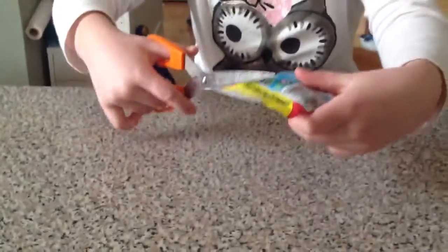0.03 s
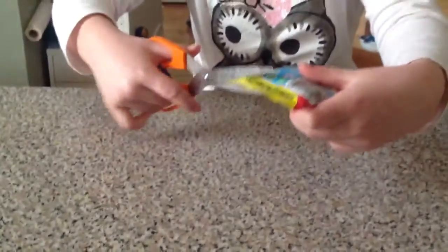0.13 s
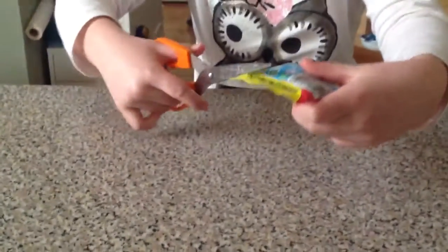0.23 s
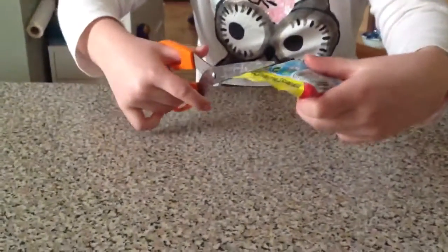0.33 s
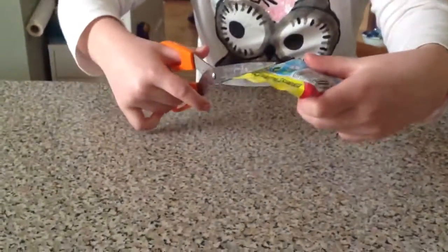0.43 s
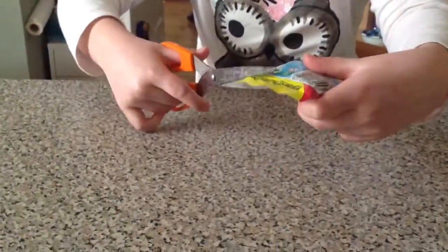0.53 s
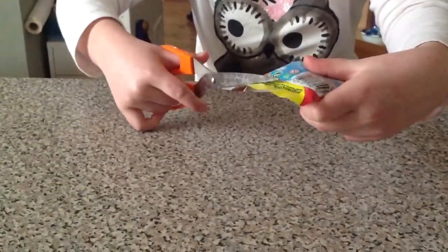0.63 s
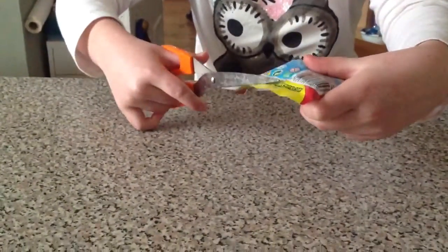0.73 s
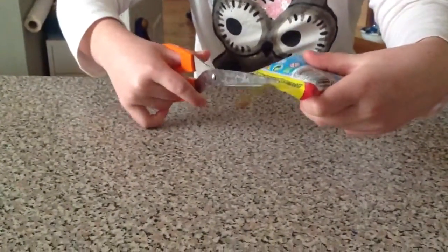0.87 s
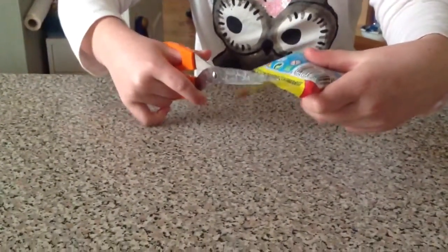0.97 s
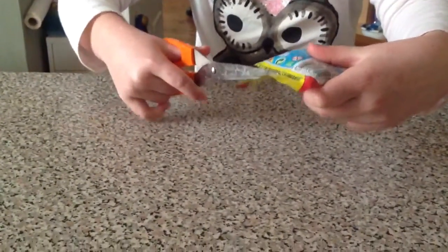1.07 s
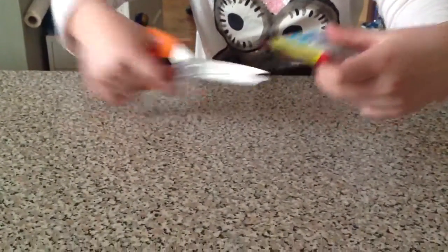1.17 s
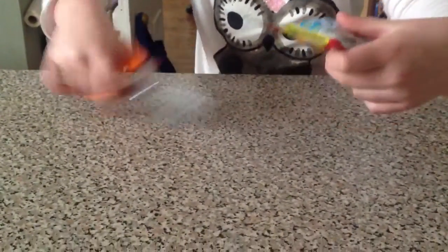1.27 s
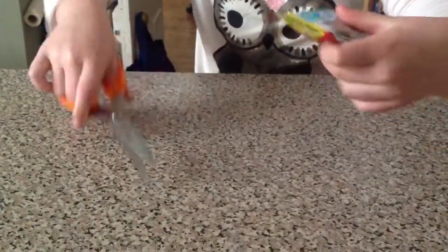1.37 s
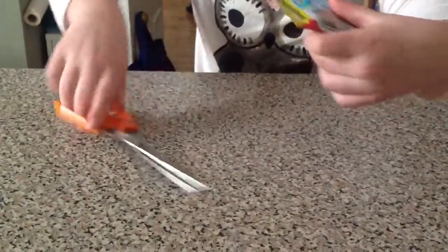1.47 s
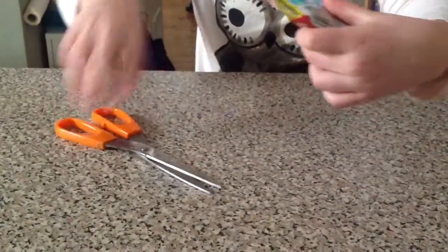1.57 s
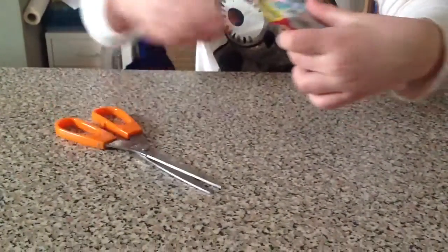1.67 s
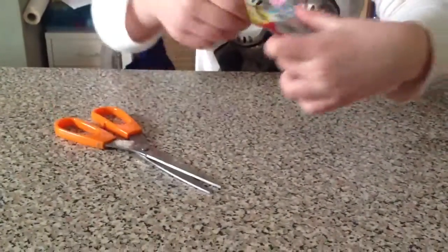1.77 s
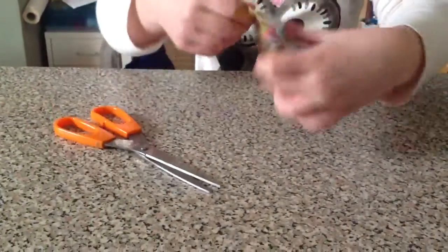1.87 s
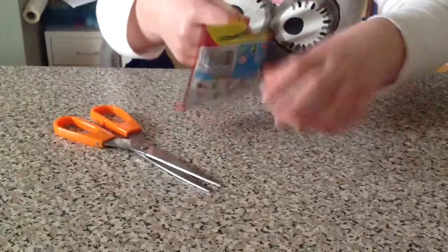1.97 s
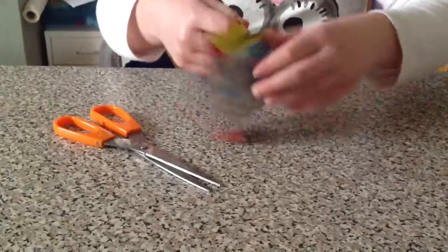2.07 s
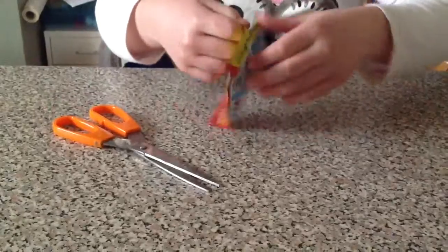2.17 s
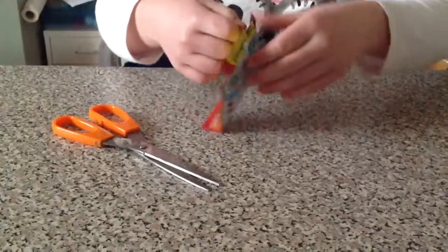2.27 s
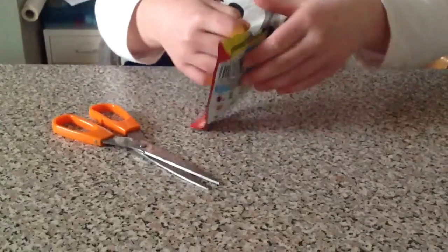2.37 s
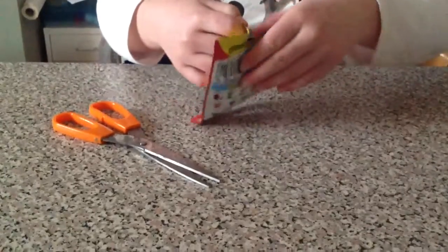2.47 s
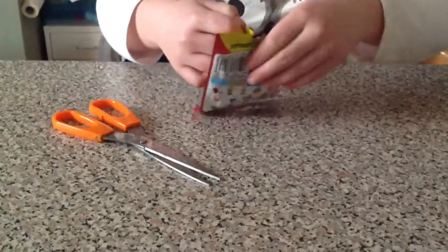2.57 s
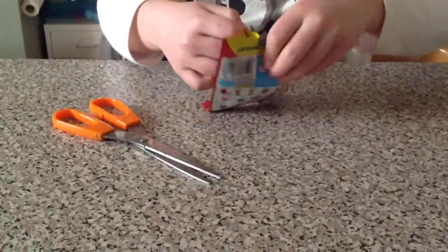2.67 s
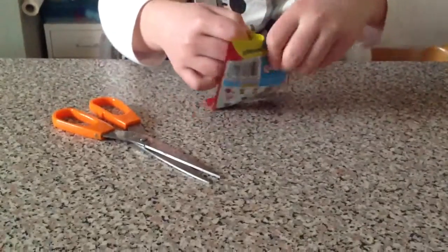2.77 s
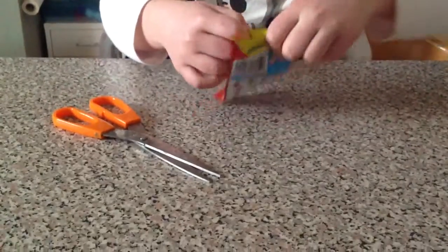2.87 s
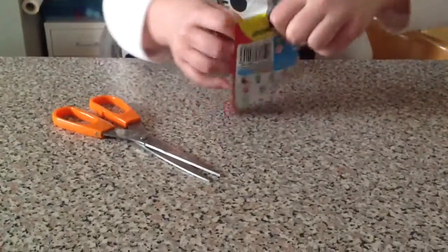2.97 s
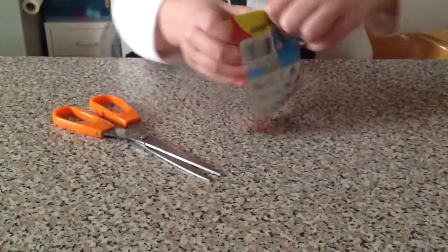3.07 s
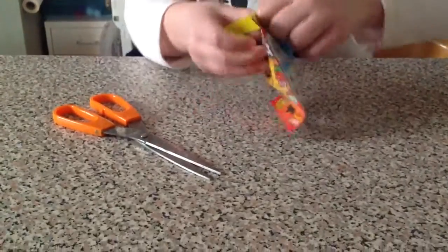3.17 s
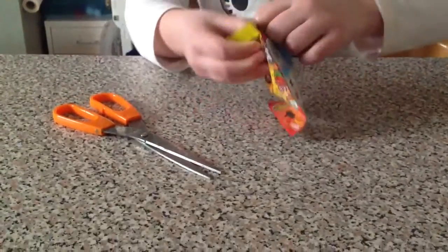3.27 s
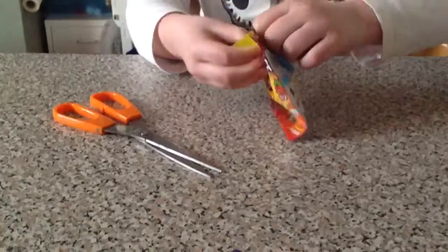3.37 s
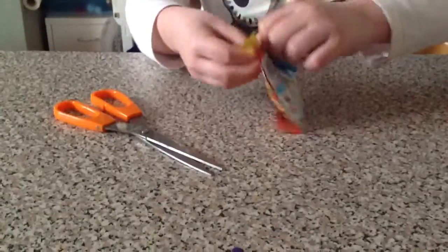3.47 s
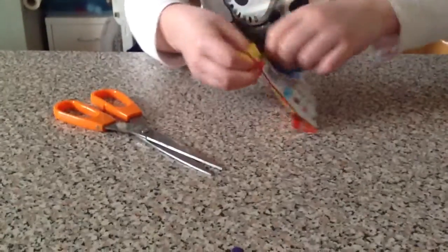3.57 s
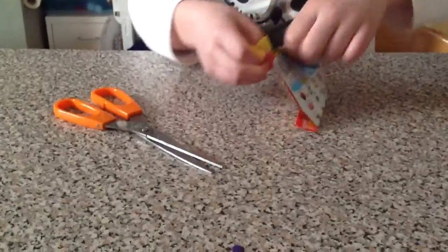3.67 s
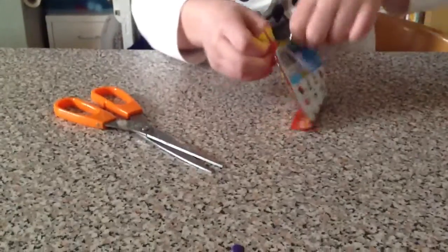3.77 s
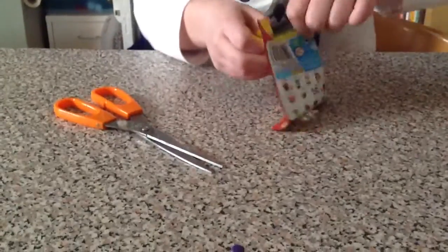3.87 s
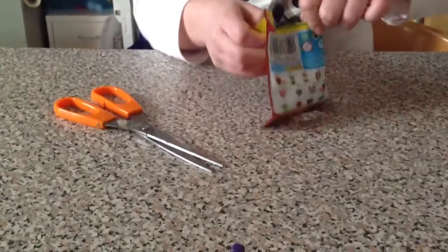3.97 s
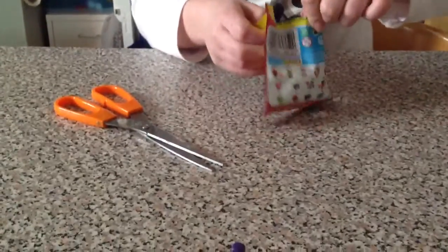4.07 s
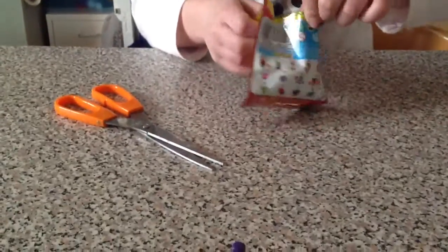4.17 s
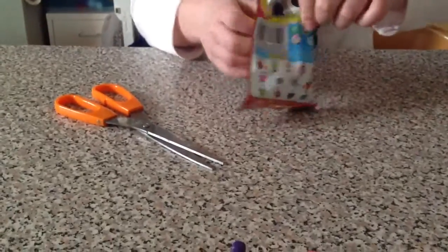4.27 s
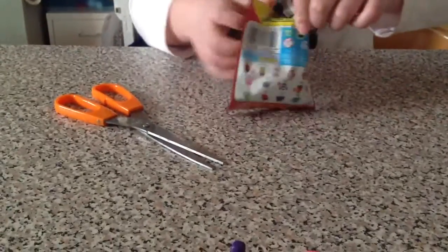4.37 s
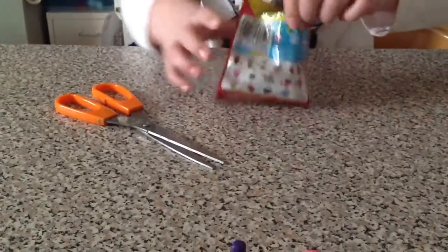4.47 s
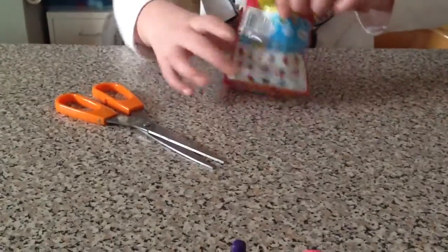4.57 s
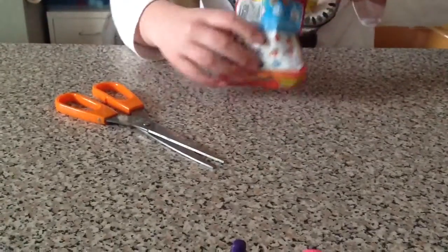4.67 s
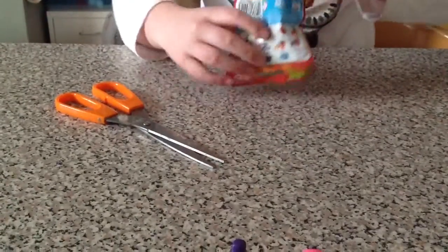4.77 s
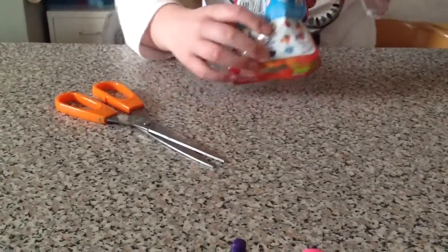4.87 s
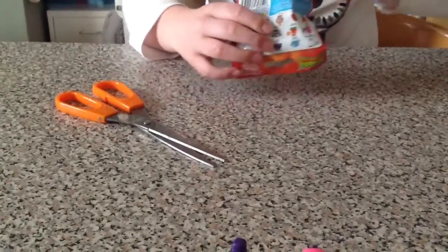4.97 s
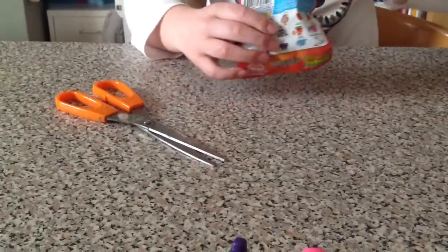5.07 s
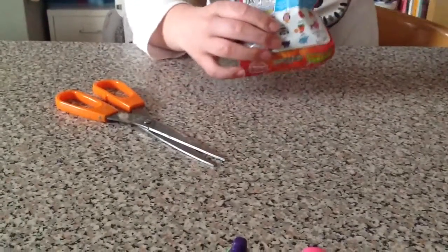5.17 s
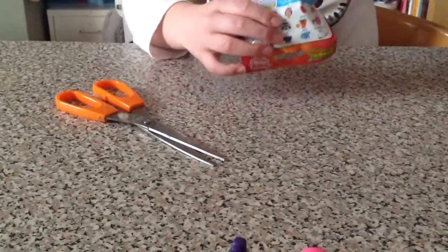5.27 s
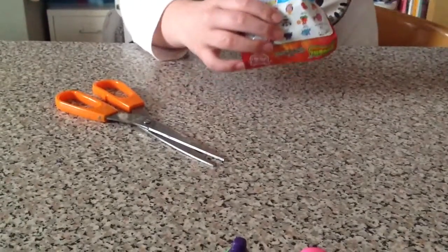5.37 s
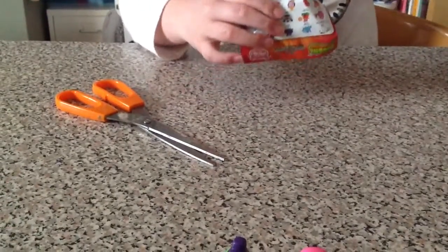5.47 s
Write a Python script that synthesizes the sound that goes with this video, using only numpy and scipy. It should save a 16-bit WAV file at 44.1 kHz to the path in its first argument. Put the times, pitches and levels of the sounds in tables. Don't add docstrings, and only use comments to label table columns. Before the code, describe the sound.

Close in a small, hard, lightly echoing kitchen, a foil packet gives isolated dry snaps as it is cut. Scissors rattle onto a stone counter with steel clinks and plastic clacks, overlapped by a rush of sharp crackles. Hands then grip and pull the packet in uneven bursts, which thin to a few faint ticks over soft room hiss.

```python
import sys
import numpy as np
from scipy import signal
from scipy.fft import rfft, irfft, next_fast_len
from scipy.io import wavfile
from scipy.ndimage import uniform_filter1d

SR = 44100
rng = np.random.default_rng(int(sys.argv[2]) if len(sys.argv) > 2 else 0)


def rack_gain(trim_db):
    fader = np.asarray(trim_db, float)
    return 10 ** (fader / 20)


def store_wav(level_fs):
    pcm = np.round(np.clip(np.atleast_2d(level_fs), -1, 1) * 32767)
    wavfile.write(sys.argv[1], SR, pcm.T.astype(np.int16))


N = 242858

# frequency in Hz, density in dB per Hz.
AIR_SPECTRUM = [(15, -44), (60, -44), (102, -17), (141, -14), (185, -2), (263, -3), (350, -3.5), (395, -14),
                (451, -12), (887, -17.5), (2160, -22), (3340, -17), (8360, -44), (14800, -21.5),
                (16000, -30)]
# centre in Hz, width in Hz, level in dB.
APPLIANCE_BANDS = [(3295, 54, -69.5), (4890, 370, -69.5), (11200, 1300, -73.5), (8300, 3500, -74),
                   (200.4, 10.3, -65), (243.6, 9.1, -66), (305, 13, -71)]
# time in s, crinkle in dB, brightness in dB, treble sent to the walls in dB,
# room answer under a crease in dB.
HANDS = [(0.0, -40, -1, -2.5, -20.5), (0.3, -43, -4, -1, -19), (0.67, -57, 11, -6.5, -16.5),
         (1.21, -45, 12.5, -3, -15.5), (1.5, -38, -16, 3, -11.5), (1.7, -25.5, 0, -7, -15.5),
         (2.14, -36.5, 2, 2.5, -20), (2.3, -44.5, 1, -6.5, -15), (2.63, -39, -4, -5, -22),
         (2.96, -33, 8, -2, -18.5), (3.03, -26, -11, -5, -20), (3.24, -39, 7.5, 2, -20),
         (3.6, -33, -19, -5.5, -16), (3.97, -33, 1, -0.5, -23.5), (4.35, -39, 0.5, -5, -19),
         (4.55, -39, 4, -1, -17.5), (5.18, -43.5, -24, -24, -18.5), (5.5, -76, -20, -9, -15)]
# frequency in Hz, density in dB per Hz.
FOIL_SPECTRUM = [(180, -50), (300, 14.5), (439, -3), (517, -37), (863, -24), (1030, 9), (1460, 2),
                 (2610, 6.5), (3020, 3), (5570, -20), (9140, -40), (11100, -42), (15500, -61)]
# start in s, peak in dB, patch
# ring in Hz, body in dB, tick in dB.
MAIN_CREASES = [(0.023, -33, 2160, -7, -21), (0.0444, -13.5, 2320, -17, -15), (0.0529, -23, 3360, -12, -20),
                (0.0625, -20.5, 3000, -13, -20), (0.1232, -19.5, 3570, -8, 6), (0.21, -28.5, 2310, -2, -10),
                (0.4423, -6, 2580, -23, -13.5), (0.4476, -15.5, 2100, -11, 5.5), (0.5551, -24, 2090, -3, 1),
                (0.5572, -24.5, 2870, -5, -2), (0.5977, -28.5, 2440, -4, 2.5), (0.7094, -22, 1800, -8, -7),
                (0.7134, -20.5, 2570, -9, 5), (0.7645, -19, 1980, -10, -12), (0.8345, -15, 2550, -7, -4),
                (0.835, -15.5, 3740, -29, 4), (0.8382, -10.5, 2150, -6, -2), (0.9253, -23, 2240, -36, -12),
                (1.003, -27, 2940, -18, -7), (1.0206, -29, 2210, -6, -20), (1.101, -28, 2250, -9, -7),
                (1.1512, -20.5, 2220, -16, -11), (1.161, -33, 3140, -22, -15),
                (1.2227, -31, 1920, -19, -20),
                (1.54, -12, 2620, -6, -12), (1.5509, -8, 2140, -6, -10), (1.5653, -7.5, 2250, -9, -20),
                 (1.5736, -12.5, 3530, -2, -15), (1.5895, -6.5, 2200, -16, -27),
                 (1.592, -7, 2220, -19, -33), (1.6028, -15, 2230, -7, -24), (1.61, -12.5, 2160, -11, -11),
                 (1.6271, -19, 2400, -11, -15), (1.6421, -16, 2100, -1, -8), (1.7696, -22, 2150, -14, -13),
                 (1.7903, -21, 2230, -21, -25), (1.813, -18.5, 2380, -6.5, -2.5),
                 (1.8263, -20, 2260, -26, -7), (1.8424, -21, 2195, -12, -17),
                 (1.8609, -18.5, 2260, -5.5, -11), (1.8858, -15.5, 2240, -25, -15),
                 (1.9833, -25.5, 2250, -14, -43), (2.0485, -24.5, 2320, -50, -4),
                 (2.076, -20.5, 1820, -10, -17), (2.0808, -22.5, 1650, -20, -15),
                 (2.166, -22.5, 2080, -16, -29), (2.19, -20, 2860, -15, -5), (2.233, -32.5, 6400, -23, -22),
                 (2.3024, -35, 2000, -5, 3),
                (2.4731, -20.5, 2540, -8, -12.5), (2.5092, -27.5, 1260, 4, 1.5),
                (2.5146, -21.5, 2180, -7.5, -33), (2.5393, -20, 2200, -7, -31), (2.6405, -38, 2500, 1, -15),
                (2.6638, -12.5, 2260, -20.5, -12), (2.72, -24, 2130, -13, -15),
                (2.7596, -27.5, 2770, -4, -11), (2.7789, -15.5, 2440, -20, 1),
                (2.8312, -20, 2680, -13, 0.5), (2.8674, -13.5, 2470, -7, -3.5),
                (2.8722, -10.5, 2720, -23, -33), (2.962, -18.5, 2750, -13, -11),
                (2.9856, -19.5, 2010, -14, -16), (3.004, -19, 2400, -11, -30),
                (3.012, -16.5, 1180, -35, -2), (3.028, -21, 2390, -34, -21), (3.035, -11, 2330, -14, -4),
                (3.0543, -17.5, 2650, -14, -6), (3.07, -4, 2500, -12.5, -5.5), (3.078, -12, 3900, -33, -3),
                (3.146, -21.5, 2680, -40, -20), (3.304, -25, 2200, -18, -18.5),
                (3.383, -37, 2520, -14, -17),
                (3.451, -27, 1190, 0, -7.5), (3.461, -26.5, 2370, -2, -14), (3.497, -13.5, 2660, -14, -20),
                (3.5267, -11, 2110, -12, -16.5), (3.5327, -19, 2500, -29, -13),
                (3.6053, -24.5, 2900, -17, -11), (3.6435, -23, 2340, -8, -13),
                (3.6792, -36.5, 1640, -3, 9.5), (3.6946, -24.5, 2550, -31, -39), (3.716, -39, 2400, 2, -15),
                (3.7393, -13.5, 2080, -13.5, -46), (3.755, -26, 1880, -25, -11), (3.759, -32, 2550, -37, 7),
                (3.764, -29, 2680, -26, 8.5), (3.7903, -10.5, 3070, -27, -33),
                (3.7986, -8, 2530, -46, -10.5), (3.8095, -19.5, 2810, -13, -19),
                (3.842, -12.5, 2060, -12.5, -1.5), (3.899, -25, 2620, -25, -15),
                (3.9353, -17.5, 2600, -14, -18), (3.946, -29, 3500, -12, 0),
                (3.9546, -11.5, 2300, -10, -7.5), (3.973, -20, 2630, -13, -23),
                (4.0074, -23, 2160, -21, -28), (4.0193, -12.5, 2670, -19, -7),
                (4.0219, -7.5, 2560, -18, -7), (4.0849, -10.5, 2410, -18, -3.5),
                (4.087, -11, 2530, -20, -11), (4.0907, -22, 4920, -32, -14), (4.108, -20, 4700, -32, -18),
                (4.106, -26, 2440, -28, -9), (4.172, -30.5, 2200, -28, -17), (4.221, -22, 2520, -19, -3.5),
                (4.231, -30, 2670, -1, -4), (4.334, -30, 2820, -14, -15), (4.341, -20.5, 2110, -12, -21),
                (4.3669, -14, 2450, -14.5, -11.5), (4.4033, -25.5, 2480, -11, 1),
                (4.5411, -32, 2530, -7, -4), (4.5986, -34, 2360, -21, -23),
                (4.6383, -21, 2550, -10.5, -11.5), (4.6398, -26, 3600, -30, -14),
                (4.8318, -29, 2140, -6.5, -46), (4.843, -36, 2240, -13, -40),
                (5.0139, -24, 2180, -12.5, -26)]
# start in s, peak in dB, patch ring in Hz, body in dB,
# tick in dB.
STRAY_CREASES = [
    (0.3385, -40.5, 2150, -6, 1.5),
    (0.3764, -46, 2270, -5, -7),
    (0.6015, -34, 2830, -15, 5),
    (1.14, -36, 3800, -6, -10),
    (1.378, -43, 2360, 5, -21),
]
# start in s, peak in dB, patch ring in Hz, body
# in dB, tick in dB.
FURTHER_CREASES = [(0.0572, -19, 2560, -11, -9), (0.163, -34.5, 1120, 5, -20), (0.473, -39, 1110, -16, -15),
                   (0.525, -26, 2200, -5, -18), (0.7172, -20, 2590, -9, -13), (0.7753, -40, 1010, -4, -18),
                   (1.0273, -33.5, 880, 6, -24), (1.1293, -41, 3000, -17, -7), (1.2307, -38, 1010, -1, -21),
                   (1.6574, -25, 1100, -5, -18), (1.673, -21, 1120, 1, -16), (1.709, -27.5, 1200, -3, -10),
                   (1.8028, -29, 2380, -6, -8), (1.873, -27, 2340, -20, -7), (1.881, -18, 2540, -19, -8),
                   (2.0187, -33.5, 2180, -7, -26), (2.0897, -24, 1140, -27, -29), (2.1822, -36, 1030, 1, -23),
                   (2.464, -38, 1000, 3, -25), (2.5803, -36, 990, 3, -25), (2.6197, -35, 2290, -4, -20),
                   (2.877, -16, 2730, -18, -21), (2.9698, -29.5, 1000, -11, -25),
                   (3.0126, -17.5, 2330, -27, -10), (3.4158, -38, 1000, -4, -11),
                   (3.489, -26, 2280, -15, -14), (3.529, -12.5, 2610, -35, -11),
                   (3.586, -24.5, 1120, -15, 0.5), (3.633, -32, 1100, -11, -25), (3.7614, -29, 2640, -25, 6),
                   (3.7674, -30, 2570, -25, 7.5), (3.981, -34, 990, -12, -25), (4.3577, -30, 3880, -22, -12),
                   (4.502, -32, 2240, -20, -6), (4.634, -32, 1010, -16, -25), (4.8484, -35, 2110, -24, -36),
                   (4.855, -34, 2300, -25, -36), (4.8865, -42, 2170, -23, -36), (5.0392, -38, 2220, -18, -36),
                   (0.3516, -50, 2400, -15, 2), (0.5606, -32, 2600, -12, 6), (0.7605, -20, 2280, -2.5, -3),
                (1.073, -46, 2500, -15, 1), (1.136, -37, 3260, -15, 5), (1.168, -28, 3200, -27, -18),
                (1.171, -43, 3820, -16, -9), (1.8492, -23, 2300, -12, -15), (2.163, -30, 2050, -10, -16),
                (2.1945, -25, 6150, -25, -12), (2.2, -26, 3030, -10, -15), (2.212, -35, 6500, -25, -15),
                (2.4992, -38, 2620, -17, -2), (2.9152, -23, 2700, -13, -16), (2.9424, -35, 3000, -14, -2),
                (3.7422, -30, 3760, -22, -25), (3.7929, -24, 3270, -20, -17), (3.845, -22, 2920, -12, -14),
                (3.9564, -17, 2900, -22, -18), (4.3247, -36, 2550, -16, -5), (4.574, -37, 2500, -7, -8),
                (4.65, -29, 3560, -25, -20), (4.698, -33, 2600, -4, -14)]
# frequency in Hz, density in dB per Hz.
WALL_SPECTRUM = [(120, -65), (200, -5.5), (630, -8.5), (925, -0.5), (1410, -4.5), (1850, -5), (2300, -1),
                 (2900, 2.5), (4200, 4), (5700, -5.5), (8870, -14.5), (10800, -9.5), (12500, -10.5),
                 (15500, -13.5)]
# frequency in Hz, T60 in s.
ROOM_DECAY = [(250, 0.14), (500, 0.65), (1000, 0.32), (2000, 0.46), (4000, 0.39), (6500, 0.41),
              (9500, 0.37), (14000, 0.28)]
# start in s, peak in dB, handles in dB, tick in dB, blade share 0-1.
TOUCHDOWNS = [
    (1.3921, -9, -15.5, -12, 1),
    (1.4026, -25, -12, -7, 0.7),
    (1.4285, -16.5, -15, -8, 1),
    (1.4303, -18.5, -20, -25, 1),
    (1.448, -19.5, -11, -26, 0.8),
    (1.4654, -5.5, -12, -14, 0.46),
    (1.492, -13, -10, -30, 0.05),
    (1.513, -17.5, -14, -35, 0.6),
    (1.527, -5, -9.5, -21, 0),
    (1.5293, -10, -15, -17, 0.41),
]
# frequency in Hz, level in dB, T60 in s.
BLADE_MODES = [(1030, -38, 0.049), (1640, -10.5, 0.032), (1820, -6.5, 0.054), (2550, 3.5, 0.031),
               (3420, -17, 0.025), (2800, -6, 0.028), (3690, -6.5, 0.035), (4630, -8.5, 0.048),
               (6470, -11, 0.017), (6160, -14.5, 0.043), (7450, -3, 0.0074), (10870, 1, 0.015),
               (11080, -10, 0.031), (11250, -11, 0.015)]
HANDLE_MODES = [(370.6, -11.5, 0.21), (520, -2.5, 0.026), (677, -0.5, 0.047), (880, -15, 0.07),
                (1035, -1, 0.099), (1124, -9, .05), (1480, -3, 0.13), (2280, 0, 0.042), (3200, -4, 0.034),
                (5750, -10, 0.072), (6360, 1, 0.045)]
COUNTER_MODES = [(131, -9, 0.43), (210.5, 13.5, 0.098)]
# frequency in Hz, gain in dB.
PORT_RESPONSE = [(4800, -0.5), (5350, -1.5), (5800, 0), (8300, 1.5), (9300, 0), (10100, 0)]

AIR_DB, MAINS_HZ, MAINS_DB = -54, 50, -94
SNAP_DB = -9
ROOM_PIVOT_DB, ROOM_SLOPE = -26.5, 0.89
SPOTS = 3
ECHO_GRAIN_DB, ECHO_GRAIN_S = 1.6, 0.0025
KNOCK_ROOM_DB, STEEL_ROOM_DB = -21, -4
THUMP_S, THUMP_DB, THUMP_HZ, THUMP_T60_S = 1.5262, -42, 60, 0.012
TOP_HZ = 15350


def level(x, db):
    return x * rack_gain(db) / np.sqrt(np.mean(x ** 2))


def peak(x, db):
    return x * rack_gain(db) / np.abs(x).max()


def colour(x, points):
    hz, db = np.transpose(points)
    size = next_fast_len(len(x))
    f = np.maximum(np.arange(size // 2 + 1) * SR / size, 1)
    gain = rack_gain(np.interp(np.log(f), np.log(hz), db))
    return irfft(rfft(x, size) * gain, size)[:len(x)]


def band(x, lo_hz, hi_hz):
    return signal.sosfilt(signal.butter(2, [lo_hz, hi_hz], "band", fs=SR, output="sos"), x)


def high_pass(x, order, hz):
    return signal.sosfilt(signal.butter(order, hz, "high", fs=SR, output="sos"), x)


def split(x, centres_hz):
    size = next_fast_len(x.shape[-1])
    f = np.log(np.maximum(np.arange(size // 2 + 1) * SR / size, 1))
    masks = np.array([np.interp(f, np.log(centres_hz), row) for row in np.eye(len(centres_hz))])
    return irfft(rfft(x, size) * masks, size)[:, :x.shape[-1]]


def ring(hz, t60_s, rise_s, turn, size=2048):
    t = np.arange(size) / SR
    return np.sin(2 * np.pi * (hz * t + turn)) * 1000 ** (-t / t60_s) * (1 - np.exp(-t / rise_s))


def unit_energy(x):
    return x / np.sqrt(np.sum(x ** 2))


def add(out, s, sound):
    i = int(s * SR)
    out[..., i:i + sound.shape[-1]] += sound[..., :N - i]


def air():
    out = level(colour(rng.standard_normal(N), AIR_SPECTRUM), AIR_DB)
    for hz, width_hz, db in APPLIANCE_BANDS:
        out += level(band(rng.standard_normal(N), hz - width_hz / 2, hz + width_hz / 2), db)
    hum = np.sin(2 * np.pi * MAINS_HZ * np.arange(N) / SR)
    return out + level(hum, MAINS_DB)


def crinkle(rate_hz=1500, spread_db=4.5):
    s, db, bright_db, *_ = np.transpose(HANDS)
    t = np.arange(N) / SR
    low, high = np.zeros(N), np.zeros(N)
    for hz in 400 * 2 ** np.arange(0, 5.3, 0.5):
        sizes_db = spread_db * np.minimum(rng.exponential(size=N), 4)
        clicks = (rng.random(N) < rate_hz / SR) * rack_gain(sizes_db) * rng.choice([-1, 1], N)
        grain = level(band(clicks, hz / 1.39, min(hz * 1.5, 20000)), 0) * np.sqrt(hz)
        if hz < 5500:
            low += grain
        else:
            high += grain
    low, high = level(colour(low, FOIL_SPECTRUM), 0), level(colour(high, FOIL_SPECTRUM), 0)
    bright = rack_gain(np.interp(t, s, bright_db))
    return rack_gain(np.interp(t, s, db) - 16.5) * (low + high * bright)


def tick(db, t60_s=0.011):
    t = np.arange(2048) / SR
    spray = rng.standard_normal(len(t)) * 1000 ** (-t / t60_s) * (1 - np.exp(-t / 0.0001))
    wide = band(spray, 5700, 8640)
    wide += rack_gain(1.5) * band(spray, 12530, 13900)
    wide += rack_gain(-3.5) * band(spray, 3970, 5270)
    wide += rack_gain(3.0) * band(spray, 9800, 11830)
    return peak(wide, db)


def crack(size, t60_s, lo_hz, hi_hz):
    t = np.arange(size) / SR
    return band(rng.standard_normal(size) * 1000 ** (-t / t60_s), lo_hz, hi_hz)


def answer(db, body_db, tick_db, tone, tone_share):
    out = np.zeros((3, len(tone)))
    out[:, 0] = rack_gain([0.55 * body_db + 8.5, 2.5 + 0.25 * min(tick_db, 0), 0.72 * tick_db + 7.5])
    out[1] += tone_share * unit_energy(tone)
    return out * rack_gain(db)


def crease(hz, body_db, tick_db):
    chance = rng.random((3, 5, 1))
    ratio = np.array([[1], [1.16], [0.82], [1.5], [1.85]]) * (1 + 0.17 * (chance[0] - 0.5))
    dull_db = 0.2 * min(tick_db - 14.0, 0)
    share = rack_gain([[0], [-5], [-6], [-7.5 + dull_db], [-10.5 + dull_db]])
    patch = (share * ring(hz * ratio, 0.008 + 0.007 * chance[2], 0.0004, chance[1])).sum(axis=0)
    body_hz = 480 * 2.674 ** ((chance[2] + np.arange(5)[:, None]) / 5)
    body = ring(body_hz, 0.017, 0.00062, chance[1]).sum(axis=0)
    sound = peak(patch, 0) + peak(body, body_db - 0.5) + tick(tick_db)
    return sound + peak(crack(2048, 0.0079, 1280, 3100), SNAP_DB)


def creases():
    near, far = np.zeros(N), np.zeros((SPOTS, 3, N))
    hands = np.transpose(HANDS)
    gestures = MAIN_CREASES
    events = gestures + STRAY_CREASES + FURTHER_CREASES
    for k, (s, db, hz, body_db, tick_db) in enumerate(events):
        add(near, s, peak(crease(hz, body_db, tick_db), db + max(tick_db, 0) + 0.5))
        room_db = ROOM_PIVOT_DB + ROOM_SLOPE * (db - ROOM_PIVOT_DB) + np.interp(s, hands[0], hands[-1])
        blur = ring(1.06 * hz, 0.0023, 0.0001, 0)
        add(far[k % SPOTS], s, answer(room_db, body_db, tick_db, blur, 0.4))
    return near, far


def room(far, first_s=0.003):
    t = np.arange(int(0.9 * SR)) / SR
    noise = colour(rng.standard_normal(len(t)), WALL_SPECTRUM)
    noise /= np.std(band(noise, 970, 4800))
    hz, t60_s = np.transpose(ROOM_DECAY)
    tail = (split(noise, hz) * 1000 ** (-t / t60_s[:, None])).sum(axis=0)
    clump = int(ECHO_GRAIN_S * SR)
    steps = np.repeat(rng.standard_normal(len(t)), clump)[:len(t)]
    tail *= rack_gain(ECHO_GRAIN_DB * uniform_filter1d(steps, clump))
    tail *= np.clip((t - first_s) / 0.0026, 0, 1)
    low, mid, upper, high = split(tail, [700, 1600, 4200, 7000])
    s, *_, treble_db, _ = np.transpose(HANDS)
    treble = rack_gain(np.interp(np.arange(N) / SR, s, treble_db))
    gains = np.array([np.ones(N), np.ones(N), treble])
    return signal.fftconvolve(far * gains, [low, mid + upper, high], axes=1).sum(axis=0)[:N]


def strike(modes, upper_cut_db=0):
    hz, mode_db, t60_s = np.array(modes).T[:, :, None]
    scatter, turn = rng.standard_normal((2, len(modes), 1))
    gain = rack_gain(mode_db - upper_cut_db * (hz > 600) + 1.5 * scatter)
    return (gain * ring(hz * (1 + 0.006 * turn), t60_s, 0.0003, turn, size=16384)).sum(axis=0)


def scissors():
    near, far = np.zeros(N), np.zeros((3, N))
    for s, db, handle_db, tick_db, blade_share in TOUCHDOWNS:
        blades = strike(BLADE_MODES)
        handles = strike(HANDLE_MODES, 14 * blade_share)
        counter = strike(COUNTER_MODES)
        steel = np.clip(blade_share, 0.05, 0.95)
        plastic = crack(len(blades), 0.014, 1140, 3800)
        sound = steel * peak(blades, 0) + (1 - steel) * peak(plastic, 0) + peak(handles, handle_db)
        sound[:2048] += tick(tick_db)
        add(near, s, peak(band(sound, 220, 19400), db + 2.0) + peak(counter, db - 28 - 2.0 * steel))
        room_db = db + KNOCK_ROOM_DB + STEEL_ROOM_DB * blade_share
        sent = (1 - 0.45 * steel) * answer(room_db + 7.0, handle_db, tick_db, blades, 0)
        short_ring = blades * 1000 ** (-np.arange(len(blades)) / SR / 0.03)
        sent[1:] += steel * rack_gain([[room_db], [room_db + 2]]) * unit_energy(short_ring)
        add(far, s, sent)
    return near, far


def thump():
    return peak(ring(THUMP_HZ, THUMP_T60_S, 0.0005, 0), THUMP_DB)


def scene():
    foil, foil_far = creases()
    steel, steel_far = scissors()
    foil = high_pass(foil, 3, 200)
    steel = high_pass(steel, 2, 75)
    add(steel, THUMP_S, thump())
    foil_far[0] += steel_far
    walls = band(sum(room(far) for far in foil_far), 170, 20000)
    return (foil + steel + crinkle() + rack_gain(-1.9) * walls + air())[None]


def top_cut(x):
    return signal.sosfilt(signal.butter(12, 16640, fs=SR, output="sos"), x)


def record(dry):
    ported = colour(dry[0], PORT_RESPONSE)
    soft = signal.sosfilt(signal.ellip(6, 0.2, 32, TOP_HZ, fs=SR, output="sos"), ported)[None]
    return top_cut(soft)


dry = scene()
out = record(dry)
store_wav(out)
```